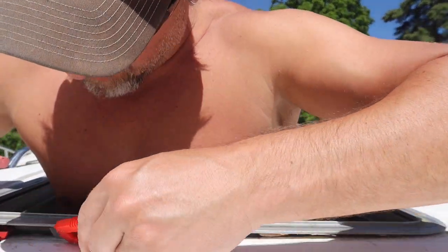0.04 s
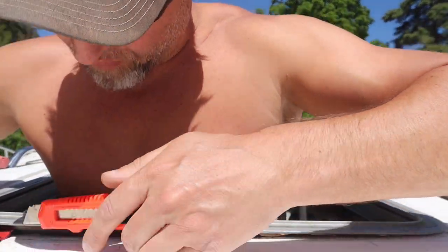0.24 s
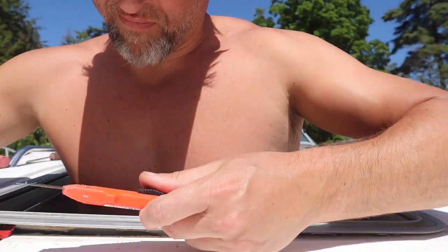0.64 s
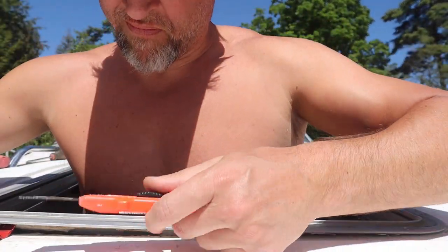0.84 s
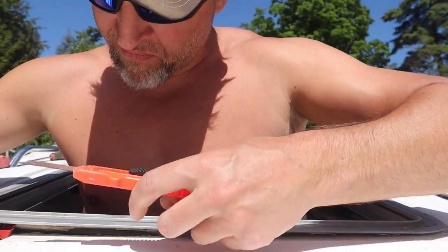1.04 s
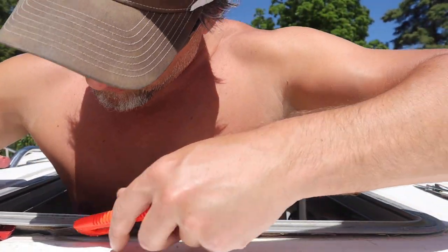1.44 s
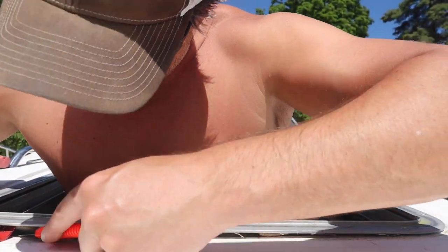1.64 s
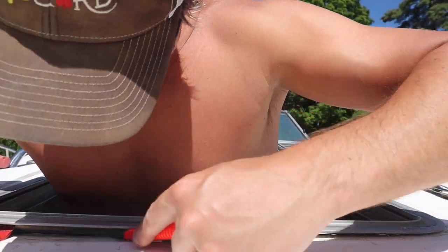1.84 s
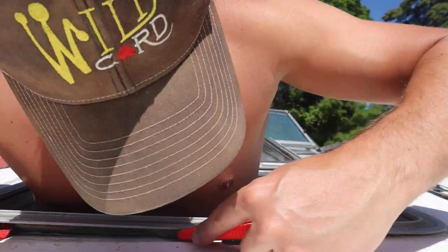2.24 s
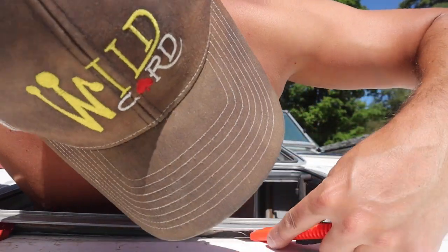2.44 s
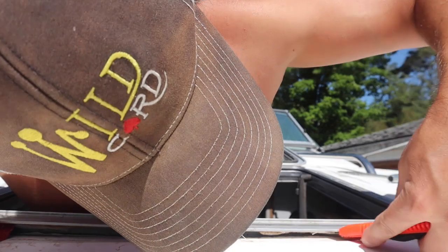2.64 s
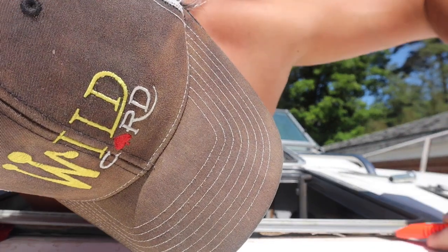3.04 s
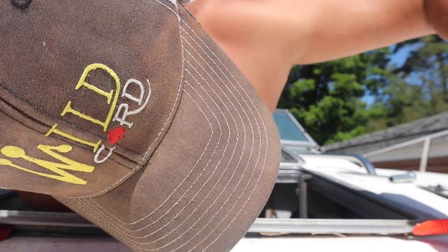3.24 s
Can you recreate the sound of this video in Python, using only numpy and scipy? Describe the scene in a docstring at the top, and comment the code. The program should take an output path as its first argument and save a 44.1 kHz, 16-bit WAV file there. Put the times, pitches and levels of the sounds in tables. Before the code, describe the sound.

Utility knife blade clicking out, then tapping and scraping on a boat's metal hatch frame.

```python
"""On a boat's deck, outdoors, a snap-off utility knife is worked along a metal hatch frame close by.
Light wind and rustling trees lie behind, and a hand bumps the hollow deck now and then.
The knife's slider ratchets the blade out and clicks back notch by notch. The tip taps into the joint,
then scrapes in gritty strokes that make the frame ring and the deck rumble."""
import sys
import numpy as np
from scipy import signal
from scipy.fft import rfft, irfft, next_fast_len
from scipy.io import wavfile
from scipy.ndimage import uniform_filter1d, map_coordinates

SR = 44100
rng = np.random.default_rng(int(sys.argv[2]) if len(sys.argv) > 2 else 0)


def materialize(psi):
    """Save the field psi as 16-bit PCM at rate SR to the path in sys.argv[1].

    A 1-D psi becomes a single channel; in a 2-D psi each row is a channel.
    """
    bounded = np.clip(np.atleast_2d(psi).T, -1, 1)
    quanta = np.round(bounded * 32767).astype(np.int16)
    wavfile.write(sys.argv[1], SR, quanta)


N = 145530


def gain(db):
    """Turn decibels into a number to multiply by."""
    return 10 ** (np.asarray(db) / 20)


def unit(x):
    """Scale a sound to an average strength (rms) of 1."""
    return x / np.sqrt(np.mean(x ** 2))


def colour(x, points, tilt_db=0):
    """Shape the tone with (pitch_hz, level_db) points; tilt_db brightens it by that much per octave."""
    size = next_fast_len(2 * len(x))
    size += size % 2
    hz, db = np.array(points, float).T
    octave = np.log2(np.maximum(np.arange(size // 2 + 1) * SR / size, 1))
    curve_db = np.interp(octave, np.log2(hz), db + tilt_db * np.log2(hz / hz.mean()))
    # fold the filter so that it only rings after a sound, never before
    cepstrum = irfft(np.log(gain(curve_db)))
    cepstrum[1:size // 2] *= 2
    cepstrum[size // 2 + 1:] = 0
    return irfft(rfft(x, size) * np.exp(rfft(cepstrum)))[:len(x)]


def wander(rate_hz):
    """A smooth random drift, typically about 1 either side of zero."""
    step = int(SR / rate_hz)
    steps = np.repeat(rng.standard_normal(N // step + 1), step)
    return unit(uniform_filter1d(steps, step)[:N])


def add(out, at_s, x, centred=False):
    """Mix x in, with its start or its middle at at_s."""
    i = int(at_s * SR) - centred * (len(x) // 2)
    out[i:i + len(x)] += x[:len(out) - i]


def ring(tones, pitch=1):
    """A struck object rings with a few pure tones, each dropping 60 dB in its fade_s."""
    t = np.arange(SR // 2) / SR
    return sum(gain(db) * np.sin(2 * np.pi * hz * pitch * t) * np.exp(-np.log(1000) * t / fade_s)
               for hz, db, fade_s in tones)


def resonate(x, hz, sharpness):
    """Make x ring around one pitch, keeping its strength."""
    ringing = signal.lfilter(*signal.iirpeak(hz, sharpness, fs=SR), x)
    return unit(ringing) * np.std(x)


def snap(body, level_db, decay_ms, tilt_db=0, lead_in_db=-25, size=4096):
    """A faint, soft lead-in just before the hit, then a burst of chatter and a tail, in the body's tone."""
    ms = (np.arange(size) - size / 2) * 1000 / SR  # the hit is in the middle
    after_ms = np.maximum(ms, 0)
    rise_ms = 0.4 + 0.28 * decay_ms  # longer contacts also build up more slowly
    lead_in = gain(lead_in_db) * np.exp(-abs(ms) / 1.5)
    burst = np.exp(-np.maximum(ms - rise_ms, 0) / decay_ms)
    tail = gain(-7) * np.exp(-after_ms / 5.34)
    loudness = lead_in + np.minimum(after_ms / rise_ms, 1) * (burst + tail)
    chatter = loudness * np.sign(rng.standard_normal(size))
    return unit(colour(chatter, body, tilt_db)) * np.std(chatter) * gain(level_db) / 2


def friction(body, grains_per_s):
    """Surfaces stick and slip: uneven grains of grit over a smooth rub, in the body's tone."""
    slips = rng.random(N) < grains_per_s / SR
    strength = gain(4 * np.clip(rng.standard_normal(N), -2, 2))
    grit = unit(slips * strength * np.sign(rng.standard_normal(N)))
    rub = 0.45 * rng.standard_normal(N)
    return unit(colour(grit + rub, body))


# tone of the wind and leaves: pitch_hz, level_db
BREEZE_TONE = [(25, -8), (52, 4), (75, -4.5), (170, -2), (400, -7.5), (6500, -25), (11000, -39),
               (16000, -44)]


def breeze(level_db=-36.5, gust_db=1.2):
    """Light wind and distant leaves, swelling a little."""
    loudness = gain(level_db + gust_db * wander(2.72))
    return loudness * unit(colour(rng.standard_normal(N), BREEZE_TONE))


# low tones of the hollow deck: pitch_hz, level_db, fade_s
DECK_BOOM = [(51.8, -2, 0.37), (157, -3.5, 0.23)]
# the hand bumping the deck: start_s, level_db, pitch_hz
HAND_BUMPS = [(0.283, -27, 374), (2.245, -18, 553), (2.347, -24, 464), (3.012, -22, 150)]


def deck_bumps(knock_decay_s=0.019, knock_db=2):
    """Soft bumps make the hollow deck boom, and each spot knocks at its own pitch."""
    out, boom = np.zeros(N), ring(DECK_BOOM)
    t = np.arange(len(boom)) / SR
    for at, db, hz in HAND_BUMPS:
        push = np.exp(-t / knock_decay_s) * rng.standard_normal(len(t))
        knock = gain(knock_db) * resonate(push, hz, sharpness=4)
        add(out, at, gain(db) * (boom + knock))
    return out


def deck_echo(x, delay_s=0.001082, strength=0.49):
    """The deck bounces back a duller copy; its delay drifts as the hand moves, shifting the tone."""
    positions = np.arange(N) - SR * delay_s * np.exp(0.2273 * wander(8.5))
    echo = map_coordinates(uniform_filter1d(x, size=4), [positions])
    return (x + strength * echo) / np.hypot(1, strength)


# tone of the plastic handle: pitch_hz, level_db
HANDLE_TONE = [(500, -28), (1650, -3), (2200, -7), (3700, 0.5), (4500, -6), (5200, -1), (7400, -12),
               (10000, -24), (16000, -45)]
# ringing tones of the steel blade: pitch_hz, level_db, fade_s
BLADE_RING = [(6260, -3, 0.088), (8990, 10.5, 0.047)]
# slow clicks of the slider: start_s, level_db, brightness_db_per_octave, decay_ms
SLIDER_CLICKS = [(0.2111, -0.5, 1, 1.16), (.2900, -17, -3, 0.5), (.3556, -7, 1, 0.43), (.3750, -12, 4.5, 2),
                 (0.472, -18, -3.5, 2.1), (0.5127, -3, 3.5, 0.5), (0.5569, -14, 1.5, 2.9),
                 (0.5894, -19, -3.5, 2.1), (0.878, -12.5, 2.5, 6.7), (0.9604, -16, 2, 1.3),
                 (0.9894, -6.5, 2, 4.3), (1.0288, -8.5, 1.5, 2.2), (1.0811, -3, 3, 1.3),
                 (1.11, -11, 1, 0.93), (1.1345, -6.5, 3, 4.1), (1.157, -14, 1.5, 3.6),
                 (1.201, -14.5, 6, 2.2), (1.3043, -3, 3.5, 1.4), (1.328, -7.5, -1, 2.2),
                 (1.3688, -16.5, -3.5, 2.9), (1.4289, -11, -5, 2)]


def slider_clicks(rattle_db=-21, ring_db=-39.5):
    """The slider clicks in the handle; the loose blade rattles just after and sings briefly."""
    out = np.zeros(N)
    for at, db, tilt, decay in SLIDER_CLICKS:
        add(out, at, snap(HANDLE_TONE, db, decay, tilt), centred=True)
        rattle_at = at + rng.uniform(0.007, 0.021)
        add(out, rattle_at, snap(HANDLE_TONE, db + rattle_db, decay, tilt), centred=True)
        grip_db = 5.5 * rng.standard_normal()  # the grip muffles some rings more than others
        pitch = np.exp(0.04 * rng.standard_normal())  # the blade's free length varies
        add(out, at, gain(db + ring_db + grip_db) * ring(BLADE_RING, pitch))
    return out


# tone of a notch: pitch_hz, level_db
NOTCH_TONE = [(500, -32.5), (1450, -5.5), (2200, -18.5), (3500, -4.5), (4400, -6.5), (5750, 0), (6600, -4),
              (8600, -5), (16000, -32.5)]
# the slider pushed fast over its notches: start_s, level_db, decay_ms
NOTCH_SNAPS = [(0.6643, 0, 2.2), (0.67, -3, 8.1), (0.7034, -2.5, 5.1), (0.7278, -2, 2.5), (0.7542, -4, 3.7),
               (0.7812, -2, 2.1)]


def slider_ratchet(ring_db=-14):
    """The slider rasps up each notch and snaps over; the blade rings as it first breaks free."""
    out = np.zeros(N)
    for at, db, decay in NOTCH_SNAPS:
        add(out, at, snap(NOTCH_TONE, db, decay, lead_in_db=-9), centred=True)
    add(out, NOTCH_SNAPS[0][0], gain(ring_db) * ring(BLADE_RING))
    return out


# tone of the tip on the frame: pitch_hz, level_db
TIP_TONE = [(300, -17), (900, -7.5), (1600, -1.5), (2100, -4), (4400, -2), (9000, -15.5), (16000, -43)]
# taps of the tip: start_s, level_db, decay_ms
TIP_TAPS = [(1.4632, -11, 10.2), (1.507, -5.5, 7.4), (1.564, -6.5, 0.88), (1.6038, 3, 3.1),
            (1.6097, -3.5, 4.4), (1.6815, 4.5, 1.6), (1.711, -6.5, 3), (1.8252, -5, 19),
            (1.968, -15.5, 4.6), (1.996, -14, 3.6), (2.0118, -19.5, 4.7), (2.027, -19, 1.4),
            (2.0384, -22.5, 12.6), (2.09, -20.5, 6.6), (2.238, -2, 6)]


def tip_taps():
    """The blade's tip strikes the metal frame with short, hard ticks."""
    out = np.zeros(N)
    for at, db, decay in TIP_TAPS:
        add(out, at, snap(TIP_TONE, db, decay), centred=True)
    return out


# the edge catching on the frame: start_s, level_db, pitch_hz
EDGE_CATCHES = [(2.306, -22, 2310), (2.3349, -8.5, 1620), (2.387, -15, 1570), (2.651, -5, 1720),
                (2.736, -5.5, 1840), (2.952, -17, 1760), (3.011, -10.5, 2040), (3.029, -7, 2470)]


def edge_catches(tick_db=-5.5):
    """The edge catches with a tick, and the frame rings at a pitch set by the spot."""
    out = np.zeros(N)
    for at, db, hz in EDGE_CATCHES:
        tick = snap(TIP_TONE, db, decay_ms=2.3)
        add(out, at, resonate(tick, hz, sharpness=6.5) + gain(tick_db) * tick, centred=True)
    return out


# tones of the scraped frame, the sliding edge and the rasping deck: pitch_hz, level_db
FRAME_TONE = [(1200, -16), (1560, 0.5), (1780, -1.5), (2100, -17.5), (2500, -8.5), (3000, -18.5),
              (3800, -11), (9000, -45)]
EDGE_TONE = [(1500, -9.5), (4500, 2.5), (5800, 0.5), (8500, -3), (11400, -16.5), (16000, -28)]
DECK_TONE = [(200, -8), (420, 0), (570, -0.5), (750, -19), (3000, -52)]
# light rubbing, by the knife or, from 0.88 s, by the hand: start_s, end_s, level_db
LIGHT_RUBS = [(0.169, 0.22, -29.5), (0.88, 1.23, -44), (1.506, 1.678, -28.5)]
# scraping strokes, each a list of points: time_s, frame_db, hiss_db, rasp_db
SCRAPE_STROKES = [
    [(1.745, -37, -41, -58), (1.785, -33, -15.5, -39), (1.84, -19.5, -28.5, -29), (1.888, -19.5, -23, -20),
     (1.95, -39.5, -54, -40)],
    [(2.135, -36, -51, -34.5), (2.175, -27, -24, -41), (2.238, -27, -19.5, -34), (2.252, -22, -32.5, -23.5),
     (2.42, -34, -36.5, -31), (2.535, -30, -35.5, -29.5), (2.588, -15, -18.5, -29),
     (2.625, -20, -34, -23.5), (2.637, -13.5, -21.5, -39), (2.735, -21.5, -25, -29.5),
     (2.752, -34, -42, -31.5), (2.773, -12, -14, -30), (2.803, -55, -57, -36)],
    [(2.997, -24, -29.5, -32), (3.025, -20.5, -20.5, -23), (3.048, -29, -42, -40)],
]


def scraping(judder_db=3.5, rumble_db=-9.5):
    """The edge hisses as it slides; where it bites, grit rings the frame and the deck rasps and rumbles."""
    t = np.arange(N) / SR
    levels = np.zeros((3, N))
    for stroke in SCRAPE_STROKES:
        times, *curves_db = np.array(stroke).T
        touching = (t >= times[0]) & (t < times[-1])
        levels += [gain(np.interp(t, times, db)) * touching for db in curves_db]
    frame_level, hiss_level, rasp_level = levels
    rub_level = sum(gain(db) * ((t > start) & (t < end)) for start, end, db in LIGHT_RUBS)
    rub_level = uniform_filter1d(rub_level, size=400)  # soften the starts and stops
    judder = gain(judder_db * np.clip(wander(168.4), -2, 1))  # a fast, uneven shake in loudness
    frame = (frame_level + rub_level / 2) * friction(FRAME_TONE, grains_per_s=1000)
    rasp = rasp_level * friction(DECK_TONE, grains_per_s=1000)
    rub = rub_level * friction(TIP_TONE, grains_per_s=500)
    boom = ring(DECK_BOOM)
    rumble = signal.fftconvolve(rasp_level * rng.standard_normal(N), boom / np.linalg.norm(boom))[:N]
    hiss = hiss_level * friction(EDGE_TONE, grains_per_s=2200)
    return judder * (frame + rasp + rub) + np.sqrt(judder) * hiss + gain(rumble_db) * rumble


def scene():
    """The knife and its echo, the bumped deck and the breeze, in one channel."""
    knife = slider_clicks() + slider_ratchet() + tip_taps() + edge_catches() + scraping()
    return (deck_echo(knife) + deck_bumps() + breeze())[None]


def record(dry, top_hz=15800):
    """The sharpest snaps overload and are clipped; the highest treble is cut."""
    treble_cut = signal.ellip(8, .2, 60, top_hz, fs=SR, output="sos")
    return signal.sosfilt(treble_cut, np.clip(dry, -1, 1))


dry = scene()
out = record(dry)
materialize(out)
```